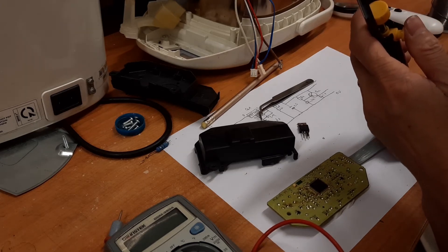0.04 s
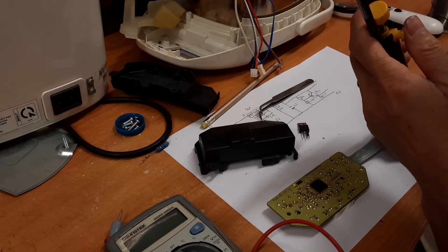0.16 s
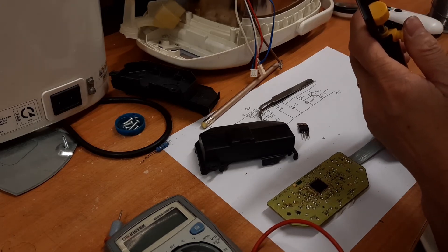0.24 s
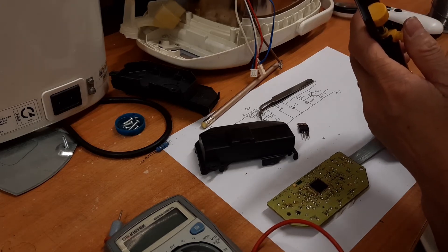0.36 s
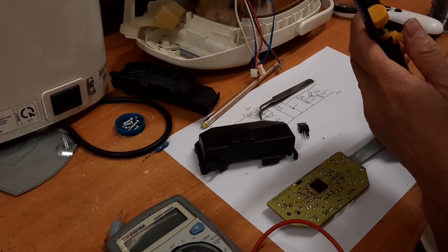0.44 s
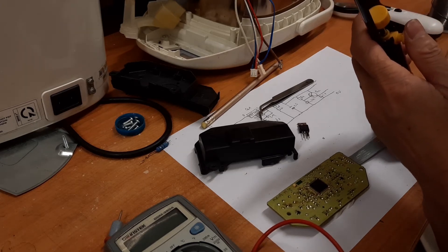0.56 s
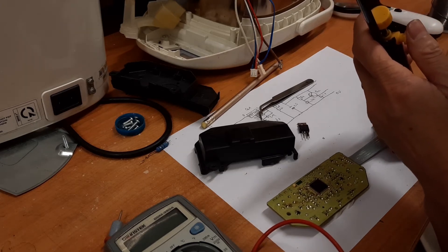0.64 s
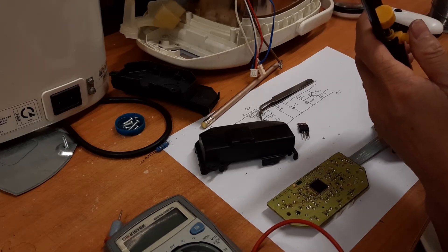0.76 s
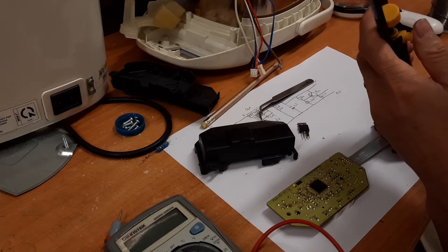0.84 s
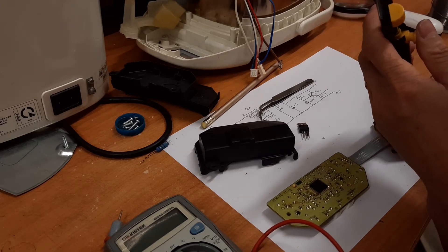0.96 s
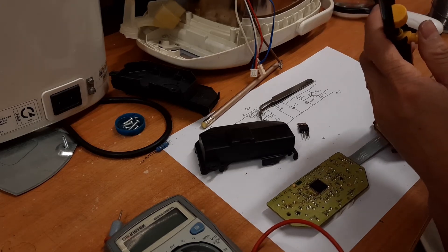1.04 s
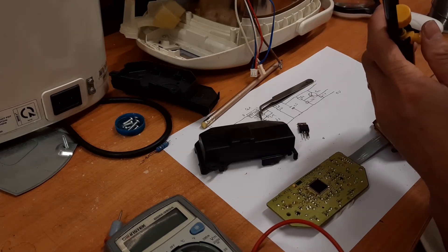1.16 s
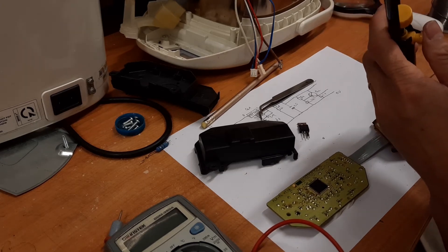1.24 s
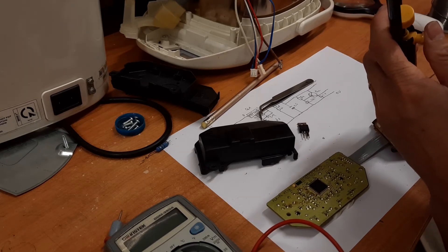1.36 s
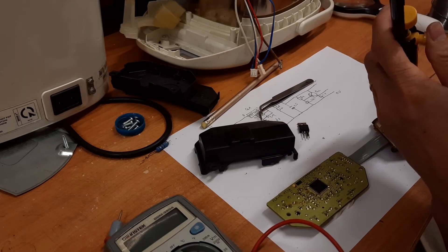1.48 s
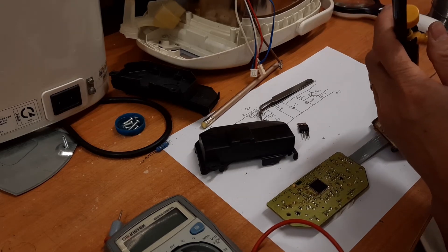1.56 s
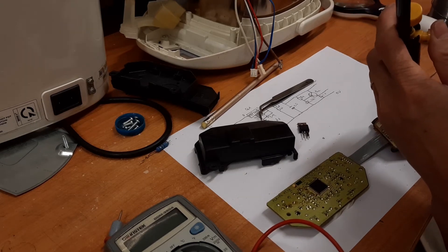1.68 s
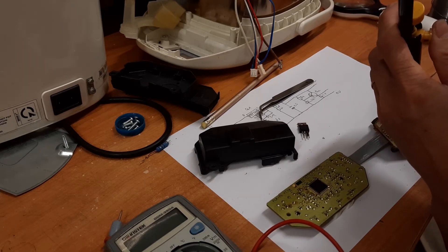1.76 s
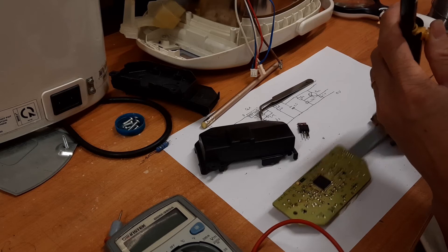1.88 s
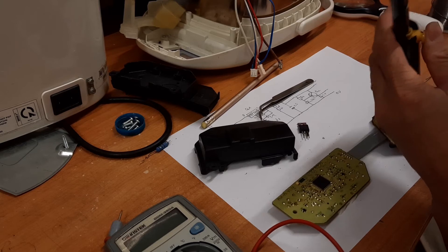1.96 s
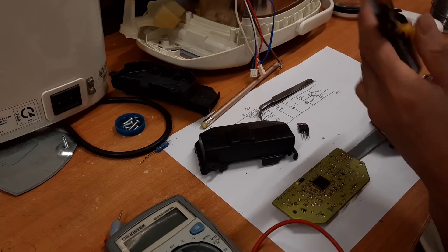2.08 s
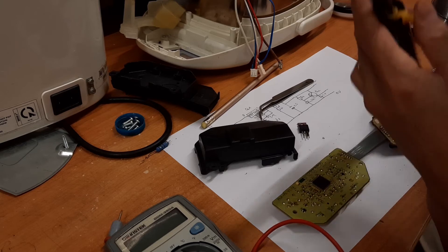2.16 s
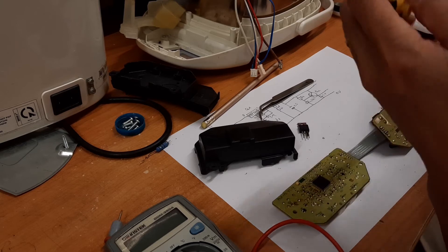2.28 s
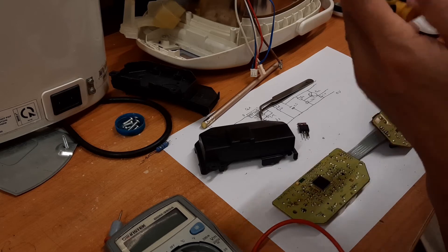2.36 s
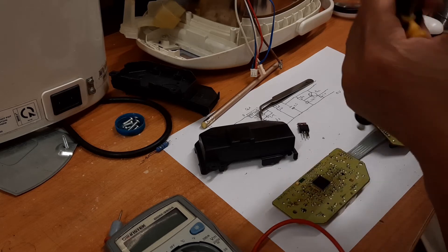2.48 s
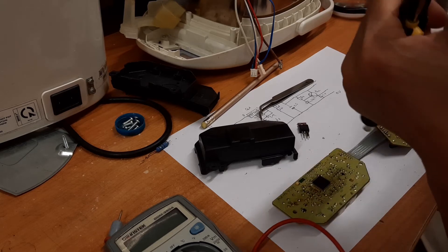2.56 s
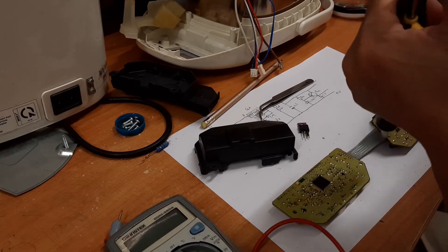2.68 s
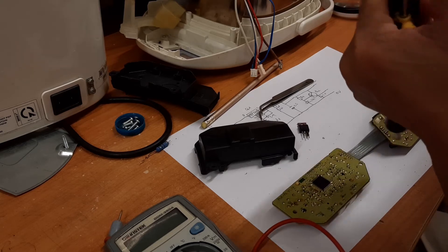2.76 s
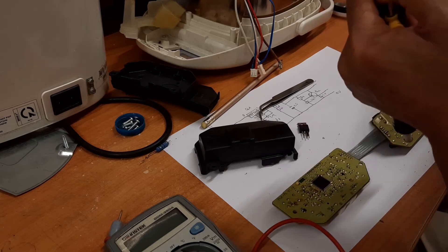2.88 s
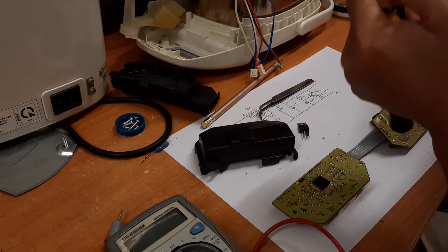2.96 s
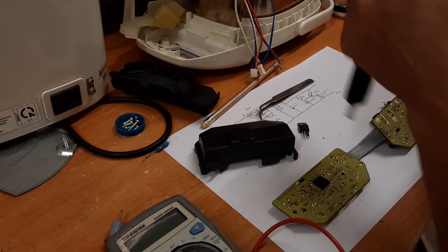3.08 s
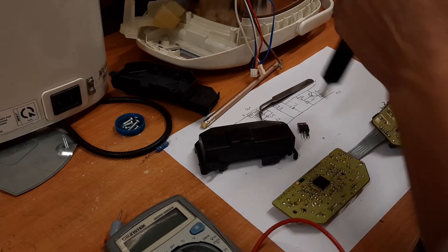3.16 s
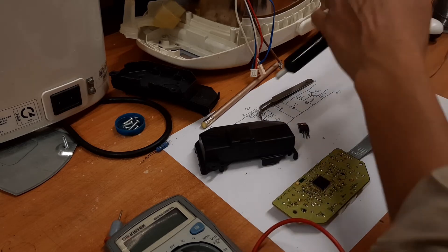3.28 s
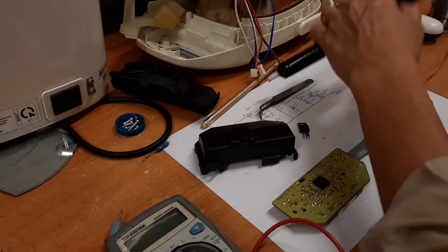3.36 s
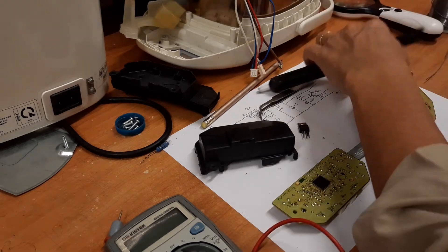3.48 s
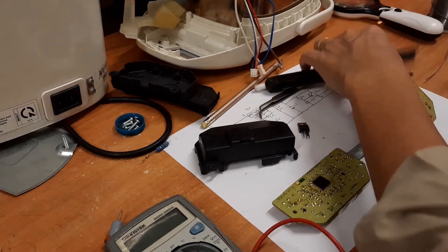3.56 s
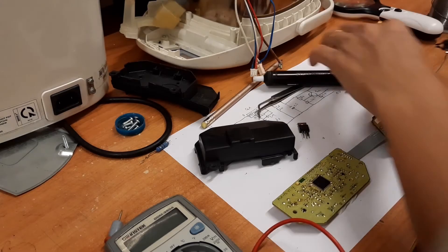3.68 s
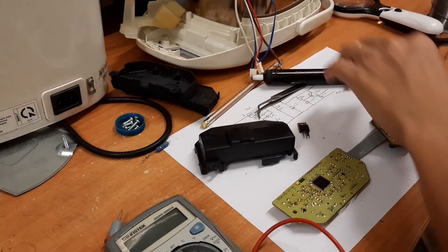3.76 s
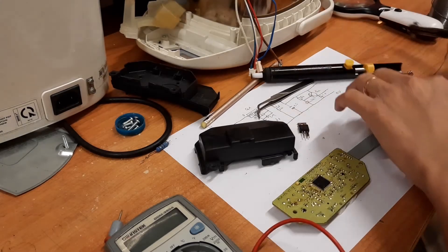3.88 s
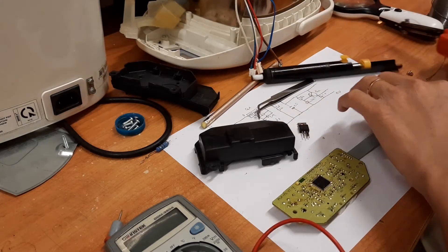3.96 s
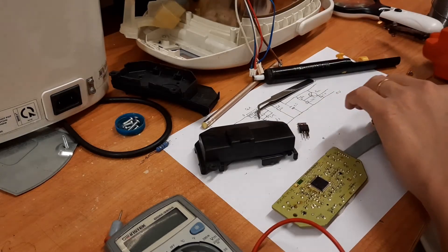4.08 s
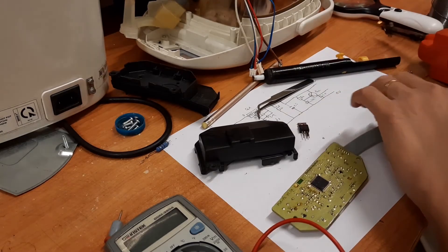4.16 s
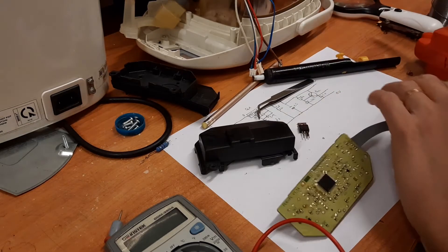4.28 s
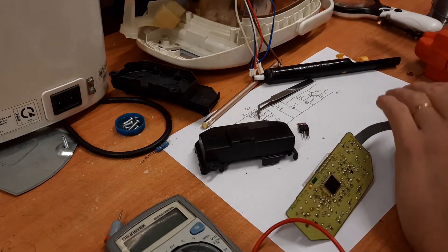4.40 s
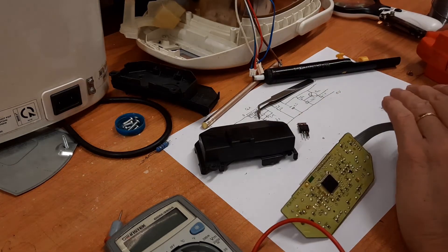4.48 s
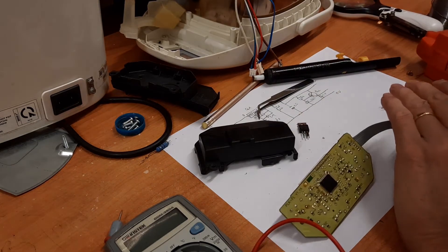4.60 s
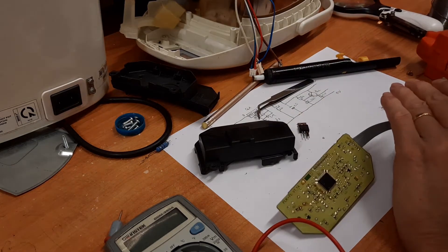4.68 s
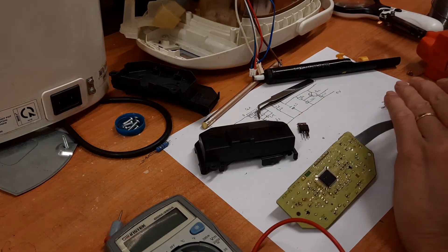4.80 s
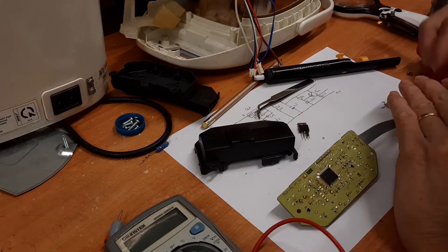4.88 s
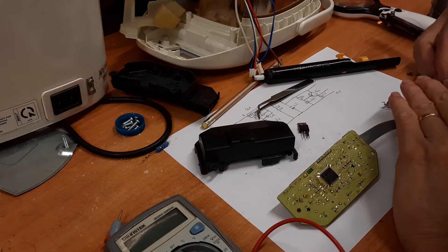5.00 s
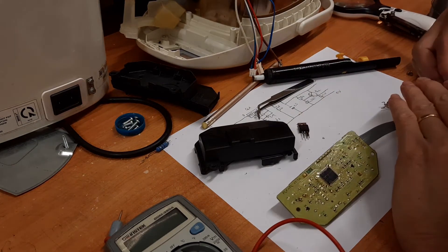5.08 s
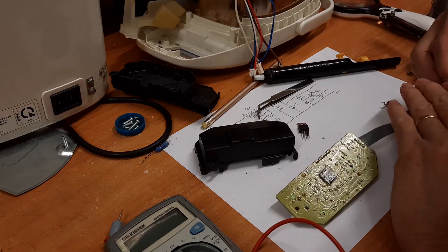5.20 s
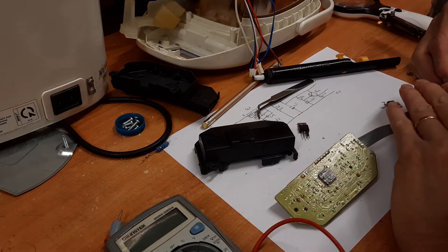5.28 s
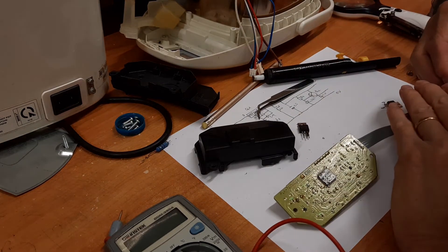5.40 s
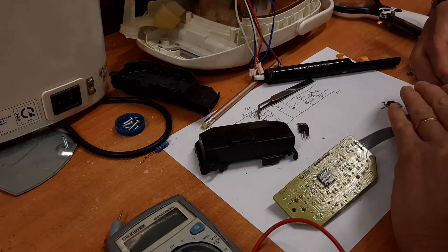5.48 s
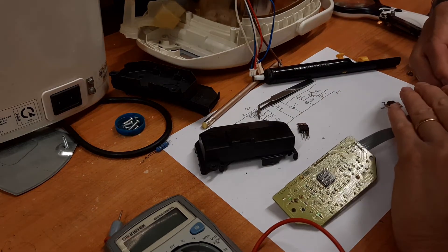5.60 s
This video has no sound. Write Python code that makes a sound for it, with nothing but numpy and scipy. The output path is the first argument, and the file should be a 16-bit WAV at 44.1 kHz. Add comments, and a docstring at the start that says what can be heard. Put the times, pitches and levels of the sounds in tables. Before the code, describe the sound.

A hand tool clicks over, snaps sharply twice at a workbench, clatters down onto wood, then heavier objects thump over a low steady hum.

```python
"""Hand tool at a workbench

A hand tool is cocked, snaps against a circuit board and is laid down with a clatter; then two heavier
things are set on the wooden top. Each blow is a noise rattle filtered by resonances, plus a modal bench thud.
Fingers rub and loose parts jitter as grainy noise, and the bench rumbles under small random pushes.
A small room answers with decaying sparse echoes, over low ventilation noise and microphone hiss.
A gain control ducks everything after each loud blow, so the hum dips."""
import sys
import numpy as np
from scipy import signal
from scipy.fft import rfft, irfft, next_fast_len
from scipy.io import wavfile
from scipy.ndimage import uniform_filter1d

SR = 44100
rng = np.random.default_rng(int(sys.argv[2]) if len(sys.argv) > 2 else 0)


def store_wav(level_fs):
    """Save 16-bit WAV to argv[1]."""
    pcm = np.round(np.clip(np.atleast_2d(level_fs), -1, 1) * 32767)
    wavfile.write(sys.argv[1], SR, pcm.T.astype(np.int16))


N = 248724  # length in samples
SPREAD_DB = 1.5  # standard deviation of each mode's weight from blow to blow


def gain_of(db):
    """Logarithmic level: decibels to amplitude gain."""
    return 10 ** (np.asarray(db) / 20)


def evened(x):
    """Power normalisation: scales to rms 1."""
    return x / np.sqrt(np.mean(x ** 2) + 1e-20)


def read(points, hz):
    """Logarithmic pitch: interpolates a table on a log-frequency axis."""
    f, value = np.transpose(points)
    return np.interp(np.log(hz + 1), np.log(f + 1), value)


def add(mix, s, sound):
    """Superposition: mixes a sound in at time s."""
    part = mix[:, round(s * SR):][:, :sound.shape[1]]
    part += sound[:, :part.shape[1]]


def noise(colour, likeness, patchy_db):
    """Partial coherence: two-channel coloured noise of rms 1 whose spectrum drifts in patches."""
    frames, hz = N // 256 + 5, np.fft.rfftfreq(1024, 1 / SR)
    a, b, c, d, patches = rng.standard_normal((frames, 513, 5)).T
    patches = uniform_filter1d(patches, 6, 0)  # smooth over pitch
    patches = evened(uniform_filter1d(patches, 12, 1))  # smooth over time
    same = np.clip(likeness(hz), -1, 1)[:, None]
    left = a + 1j * b
    right = same * left + np.sqrt(1 - same ** 2) * (c + 1j * d)
    spectrum = np.array([left, right]) * gain_of(read(colour, hz)[:, None] + patchy_db * patches)
    return evened(signal.istft(spectrum, nperseg=1024, noverlap=768)[1][:, :N])


# Airflow spectrum. Each row: frequency in Hz, relative density in dB per Hz.
AIRFLOW = [(12, -63), (20, -30.5), (49, -9.5), (76, -31.5), (93, -20), (114, -1.5), (174, -8), (217, -5.5),
           (250, -13.5), (325, -2), (398, -28.5), (517, -17), (840, -35), (987, -42), (2500, -60.5),
           (3250, -91.5), (5500, -120)]
# Left-right coherence of the airflow. Each row: frequency in Hz, correlation from -1 to 1.
AIRFLOW_LIKENESS = [(60, 0.96), (180, 0.94), (550, 0.47), (1650, -0.52), (4970, -0.4), (15000, -0.1)]
# Duct resonances. Each row: frequency in Hz, width of one filter pass in Hz, rms level in dB before panning.
DUCT_MODES = [(122.8, 27, -46.5), (329.7, 12, -51)]


def hum():
    """Resonance driven by turbulence: low ventilation noise with two ducts singing in it."""
    out = gain_of(-43) * noise(AIRFLOW, lambda hz: read(AIRFLOW_LIKENESS, hz), patchy_db=2.0)
    for hz, width, db in DUCT_MODES:
        radius = np.exp(-np.pi * width / SR)
        poles = [1, -2 * radius * np.cos(2 * np.pi * hz / SR), radius ** 2]
        once = signal.lfilter([1], poles, rng.standard_normal(N))
        twice = signal.lfilter([1], poles, once)
        out = out + gain_of(db) * evened(twice)
    return out * gain_of([[.6], [-.6]])


# Hiss spectrum. Each row: frequency in Hz, relative density in dB per Hz.
HISS_COLOUR = [(1180, -31), (2000, -1), (2500, -7), (4140, -10), (6540, -12), (8620, -16), (11800, -7),
               (14100, -4), (15800, -5)]


def hiss():
    """Self-noise: the microphone's own weakly coherent hiss."""
    return gain_of(-77) * noise(HISS_COLOUR, lambda hz: .3 + 0 * hz, patchy_db=-0.3)


def rattle(contact_ms, size):
    """Spectral flattening: a burst of chatter, about equally strong at all pitches."""
    u = np.arange(size) / SR * 1000 / max(contact_ms, .3)
    shape = (1 - np.exp(-u * 6.7)) * np.exp(-u * 0.87)
    spectrum = rfft(rng.standard_normal(size) * shape)
    flattened = spectrum / (abs(spectrum) + 1e-9) ** .8
    return irfft(flattened) * shape ** .3


def causal(gain):
    """Minimum phase: a body rings only after it is struck, so the cepstrum is folded forward in time."""
    cepstrum = irfft(np.log(gain + 1e-5))
    half = len(cepstrum) // 2
    cepstrum[1:half] *= 2
    cepstrum[half + 1:] = 0
    return np.exp(rfft(cepstrum))


# Modes of the wooden top. Each row: frequency in Hz, mean relative level in dB, 60 dB decay time in seconds.
BENCH_MODES = [(82, -2, 0.1), (126.7, 3.5, 0.062), (172.2, -3, 0.1), (199.5, -3, 0.066), (230, 2.5, .11),
               (264.4, -1, 0.19), (303.2, 1, 0.086), (353.4, -2.5, 0.032), (434, 2.5, 0.058),
               (534, 2.5, 0.023), (602, 6, 0.04), (763, -8.5, 0.02), (907, -3.5, 0.079),
               (1337, -10.5, 0.019)]


def bench_top(t):
    """Modal superposition: damped modes of the wooden top, neighbours in opposite sense."""
    hz, db, t60 = np.transpose(BENCH_MODES)[:, :, None]
    db = db + SPREAD_DB * rng.standard_normal(hz.shape)
    sense = (-1) ** np.arange(len(hz))[:, None]
    return (sense * gain_of(db - 60 * t / t60) * np.sin(2 * np.pi * hz * t)).sum(0)


# Band centres, from knock to fizz. Each row: frequency in Hz.
BANDS = [950, 3200, 6700, 12500]


# Blow tables below. Each row: start in seconds, click peak in dB before panning, brightness in dB per octave,
# contact time scale in ms, bench thud peak in dB relative to the click.
# Body tables below. Each row: mode frequency in Hz, half-power width in Hz, mean relative level in dB.
# Hit tables below hold: drive in dB in each of BANDS, left-right difference in dB, lag of the left in ms.
def blows(events, body, hit, crack_db, alike):
    """Source and filter: each contact is a short rattle that rings the thing struck and knocks the bench."""
    lead_s = .001  # room before a click for the port delays
    out, t, bins = np.zeros((2, N)), np.arange(SR // 4) / SR, np.fft.rfftfreq(4096, 1 / SR)
    hz, width, mode_db = np.transpose(body)[:, :, None]
    bands_db, pan_db, lag_ms = hit
    drive_db = read(list(zip(BANDS, bands_db)), bins)
    octaves = np.log2(np.clip(bins, BANDS[0], BANDS[-1]) / 3800)  # brightness turns about 3800 Hz
    low_cut = (bins / (bins + 400)) ** 2 / np.sqrt(bins + 400)
    halves = np.array([[.5], [-.5]])
    ports = np.exp(-2j * np.pi * bins * (lead_s + halves * lag_ms / 1000))
    sides_db = halves * pan_db
    for s, db, bright_db, contact_ms, thud_db in events:
        weight = gain_of(mode_db + SPREAD_DB * rng.standard_normal(hz.shape))
        peaks = (weight ** 2 / (1 + (2 * (bins - hz) / width) ** 2)).sum(0)
        struck = np.sqrt(peaks + gain_of(crack_db) ** 2)  # the bare crack fills between the modes
        colour = gain_of(drive_db + bright_db * octaves) * low_cut
        left, other = rattle(contact_ms, size=2048), rattle(contact_ms, size=2048)
        right = alike * left + np.sqrt(1 - min(alike, 1) ** 2) * other
        click = irfft(rfft([left, right], 4096) * causal(struck * colour) * ports)
        # the push on the bench is a smooth pulse, briefer for a shorter contact
        push = np.clip(t[:800] * 1000 / (0.3294 * max(contact_ms, .3)), 0, 1)
        knock = np.sin(np.pi * push) ** 2 / max(contact_ms, .3)
        knock = knock + 0.059 * left[:800] / abs(left).max()
        thud = signal.fftconvolve(bench_top(t), knock)
        add(out, s - lead_s, gain_of(db + sides_db) * click / abs(click).max())
        add(out, s, gain_of(db + thud_db + np.array([[.7], [-.7]])) * thud / abs(thud).max())
    return out


# Blows of the tool in the hand, its modes and its hit.
TOOL_BLOWS = [(.985, -65, 7, 1.9, -30), (1.025, -70, 3, 3.3, -30), (1.09, -70, 1, 3, -26),
              (1.155, -71, 1.5, 3, -23), (1.835, -17, -3.1, 13, -33), (1.849, -8, 5, 1.75, -23),
              (1.928, -24.5, -4.3, 1.9, -17.5), (2.087, -50.5, 8, 5, -23.5), (2.257, -42, 7, 1.75, -22),
              (2.284, -44, 3, 4.7, -24), (2.321, -46, 1.2, 4, -23), (2.458, -54.5, 1.5, 1.9, -22.5),
              (2.53, -45.5, -9.5, 7.3, -26), (2.614, -54.5, -4, 3.5, -8.5),
              (2.624, -52.5, -4.5, 6.8, -17.5), (2.697, -38.5, -0.2, 1.9, -25.5),
              (2.796, -47, -3.8, 3.4, -19), (2.855, -42.5, -4.5, 2.6, -25.5), (5.172, -55, 1, 4.6, -23),
              (5.621, -32, 1.5, 2.45, -14)]
TOOL_MODES = [(830, 270, 0.5), (1263, 44, 5), (2160, 120, 6), (2840, 290, -1.5), (3970, 730, -11.5),
              (5910, 2700, 2.5), (7360, 1100, 2), (12300, 1500, -5), (14700, 400, 2)]
TOOL_HIT = ((-6, -1.9, -3.5, -4), 1.1, .12)


def clicks():
    """Impact excitation: the hand tool clicks and knocks as it is handled."""
    return blows(TOOL_BLOWS, TOOL_MODES, TOOL_HIT, crack_db=-11, alike=0.45)


# Blows of the latch, modes of the cocked tool and its hit.
LATCH_BLOWS = [(1.658, -40.5, -1.2, 4.9, -31.5), (1.726, -41, 0, 2.2, -34), (1.734, -46.5, 9, 3.5, -27.5),
               (1.76, -45.5, -.5, 4, -32.5), (1.769, -12, -1.8, 3.7, -27.5)]
COCKED_MODES = [(970, 90, 23.5), (1270, 77, 14), (2050, 300, -36), (2760, 290, 7), (3790, 350, -1.5),
                (5440, 270, 2), (7400, 430, 6), (12830, 1600, -0.5)]
COCKED_HIT = ((-17.5, -0.5, -9, -13.5), 1.1, 0.17)


def latch():
    """Impact excitation: the plunger is cocked and its latch clicks over."""
    return blows(LATCH_BLOWS, COCKED_MODES, COCKED_HIT, crack_db=-12, alike=0.46)


# Stroke tables below. Each row: start in seconds, hold in seconds, rms level in dB before the droop.
# Stroke shapes below hold: rise in seconds, droop while held in dB per second, release in dB per second.
def level_of(strokes, shape):
    """Envelope: each stroke rises, droops while held, then dies away exponentially."""
    (rise_s, droop_db, release_db), level = shape, np.zeros(N)
    for start, hold, db in strokes:
        t = np.arange(N) / SR - start
        fall_db = droop_db * np.clip(t, 0, hold) + release_db * np.maximum(t - hold, 0)
        level += np.clip(t / max(rise_s, .001), 0, 1) * gain_of(db - fall_db)
    return level


# Hands and tool shifting on the bench top: strokes and their shape.
SHUFFLE_STROKES = [(1.835, 0.029, -26), (1.935, 0.023, -28.5), (3.467, 0.018, -28.5), (3.525, .03, -50.5),
                   (3.61, 0.35, -40), (3.962, 0.0072, -36)]
SHUFFLE_ENVELOPE = (0.01103, 20, 940)


def shuffle():
    """Random forcing of modes: small uneven pushes keep the bench top rumbling."""
    unevenness = evened(uniform_filter1d(rng.standard_normal(N), 300))
    pushes = rng.standard_normal(N) * gain_of(4 * unevenness)
    top = np.convolve(bench_top(np.arange(SR // 4) / SR), np.hanning(60))  # soft skin dulls the push
    rumble = evened(signal.oaconvolve(pushes, top)[:N])
    return rumble * level_of(SHUFFLE_STROKES, SHUFFLE_ENVELOPE) * gain_of([[.7], [-.7]])


def friction(level, colour, grain_db, grain):
    """Stick-slip: grainy noise under each stroke; grain is the length of one slip in samples."""
    slips = gain_of(grain_db * evened(uniform_filter1d(rng.standard_normal(N), grain)))
    return noise(colour, lambda hz: 0.27 + 0 * hz, patchy_db=2.0) * level * evened(slips)


# Loose parts after a blow: strokes and their shape.
JITTER_STROKES = [(1.85, 0.1, -40.5), (3.635, 0.093, -47), (3.88, .025, -59.5), (4.19, 0.13, -64),
                  (4.31, 0.09, -63)]
JITTER_ENVELOPE = (0.027, 28, 580)
# Spectrum of the loose parts. Each row: frequency in Hz, relative density in dB per Hz.
LOOSE_COLOUR = [(410, -34.5), (700, -2), (1110, -4), (1630, -6), (2040, 0), (3020, -6.5), (6660, -10.5),
                (10200, -14.5), (13900, -12), (15700, -12), (16300, -26)]


def jitter():
    """Granular noise: loose parts jitter after a blow, with strong short grains."""
    return friction(level_of(JITTER_STROKES, JITTER_ENVELOPE), LOOSE_COLOUR, grain_db=5, grain=90)


# Fingers rubbing: strokes and their shape.
RUB_STROKES = [(2.252, .09, -66), (2.52, 0.0086, -67), (2.606, 0.069, -64), (2.692, .05, -62),
               (2.76, .11, -64.5), (5.07, 0.027, -73.5), (5.17, 0.0055, -66)]
RUB_ENVELOPE = (0.0053, 41, 310)
# Spectrum of the rubbing. Each row: frequency in Hz, relative density in dB per Hz.
RUB_COLOUR = [(410, -33), (700, -6), (948, -5.5), (1390, -9.5), (1690, -3), (2120, 3.5), (2900, -13),
              (3680, -8), (4610, -23), (7500, -7.5), (9260, -19.5), (11900, -16), (15300, -14),
              (16300, -17.5)]


def rubs():
    """Sliding friction: fingers rub, with longer and gentler grains."""
    return friction(level_of(RUB_STROKES, RUB_ENVELOPE), RUB_COLOUR, grain_db=3.5, grain=150)


# Blows of the plunger snapping loose, modes of the barrel and its hit.
SNAP_BLOWS = [(2.89, -6.5, 2, 3, -30.5), (3.006, -33, -2.5, 4.5, -31.5), (3.119, -40, -3.8, 3.5, -33)]
BARREL_MODES = [(1200, 310, 3.5), (2830, 400, 5), (4300, 670, 7), (5440, 400, -8.5), (6980, 460, 3),
                (8510, 500, 2), (10210, 700, 1.5), (13100, 790, -4), (13600, 810, -2)]
BARREL_HIT = ((-4, 0, -6, 3), 2.1, 0.046)


def snap():
    """Impact excitation: the plunger snaps loose and the barrel rings."""
    return blows(SNAP_BLOWS, BARREL_MODES, BARREL_HIT, crack_db=-30.5, alike=0.2)


# Blows of the rebounding plunger, modes of its stop and its hit.
REBOUND_BLOWS = [(3.018, -23.5, 4.5, 15, -21), (3.0265, -9.5, -1.5, 0.9, -19.5)]
STOP_MODES = [(704, 480, 11.5), (1320, 170, -46.5), (2880, 940, 2), (6660, 2200, 1.5), (13640, 2400, 1.5)]
STOP_HIT = ((-4.5, 1, -1.9, -6.5), 0.37, .057)


def rebound():
    """Impact excitation: the plunger rebounds against its stop."""
    return blows(REBOUND_BLOWS, STOP_MODES, STOP_HIT, crack_db=-18.5, alike=0.266)


# Blows of the tool laid on the bench, its modes there and its hit.
CLATTER_BLOWS = [(3.47, -42.5, -1.8, 4.8, -24), (3.519, -47.5, -3.5, 3, -19), (3.566, -33, 4.2, 2.4, -12),
                 (3.583, -22, 1.5, 12, -20), (3.602, -4.5, -4, 1.6, -17), (3.687, -15, -0.2, 4.6, -20),
                 (3.724, -23, -1.5, 4.8, -14.5), (3.792, -36, -11, 6.8, -12),
                 (3.966, -26.5, -2.5, 2.9, -36)]
LAID_MODES = [(586, 120, 11.5), (1466, 180, 9.5), (2700, 200, -35), (3660, 170, -2), (4754, 180, 9),
              (5850, 1250, 11.5), (7170, 890, 7), (12180, 400, -12), (14700, 1000, -7)]
LAID_HIT = ((-2.4, 0, -8, 4.25), 2.7, 0.157)


def clatter():
    """Repeated impact: the tool is laid on the bench with a clatter."""
    return blows(CLATTER_BLOWS, LAID_MODES, LAID_HIT, crack_db=-5, alike=.4)


# Blows of heavy things set down, their modes and their hit.
THUMP_BLOWS = [(4.1615, -13.5, -8, 5.5, 8), (4.184, -36, 0, 3.8, 20), (4.222, -27, -8.5, 3.7, 6.5),
               (4.358, -23, -7.5, 1.6, -8), (4.37, -40, -6.5, 5.3, 13.5), (4.421, -14, -10, 6.4, 3),
               (4.4385, -13.5, -8.5, 1.9, 8.5), (4.461, -43.5, -9.6, 8.2, 14)]
HEAVY_MODES = [(920, 360, -1), (1567, 300, 0.5), (2090, 1220, 0), (2620, 800, 7), (5000, 2590, -10),
               (12600, 4900, 2.5)]
HEAVY_HIT = ((3.5, -2, 1.5, -1), 1.43, 0.15)


def thumps():
    """Impact on a plate: heavy things set down, most with a bench thud louder than their click."""
    return blows(THUMP_BLOWS, HEAVY_MODES, HEAVY_HIT, crack_db=-3.5, alike=0.19)


# Left-right coherence of the room. Each row: frequency in Hz, correlation.
ECHO_LIKENESS = [(150, 1), (500, 0.83), (1200, 0.067), (4000, 0.24), (12000, 0.11)]
# What the walls send back. Each row: frequency in Hz, relative level in dB.
WALL_COLOUR = [(300, 0.86), (1500, 0.15), (4000, 1.57), (9000, -2), (15000, -1.5)]
# Reverberation. Each row: frequency in Hz, 60 dB decay time in seconds.
ROOM_DECAY = [(150, .45), (500, 0.47), (1500, 0.43), (4000, 0.37), (9000, 0.41), (15000, 0.37)]


def room(x):
    """Diffuse reverberation: sparse taps of random sign, each band dying at its own speed, the bass coherent."""
    taps = np.zeros((2, SR))
    at = np.arange(200, SR - 20, 20) + rng.integers(0, 20, (2, (SR - 201) // 20))
    np.put_along_axis(taps, at, rng.choice([-1., 1.], at.shape), 1)
    hz, t, (a, b) = signal.stft(taps, SR, nperseg=256)
    same = np.clip(read(ECHO_LIKENESS, hz), -1, 1)[:, None]
    pair = np.array([a, same * a + np.sqrt(1 - same ** 2) * b])
    pair = pair * gain_of(read(WALL_COLOUR, hz))[:, None]
    decay = gain_of(-60 * (t / read(ROOM_DECAY, hz)[:, None]) ** 0.93)  # slightly faster at first
    tail = signal.istft(pair * decay, SR, nperseg=256)[1]
    # the left channel alone feeds both sides of the room
    return signal.fftconvolve(x[:1], tail / np.linalg.norm(tail[0]), axes=1)[:, :N]


def scene():
    """Superposition: all sources, with the room answering all but the hum."""
    hand = latch() + clicks() + snap() + rebound() + rubs() + jitter()
    laid = clatter() + shuffle()
    heavy = thumps()
    echo = room(gain_of(-9.5) * hand + gain_of(-5.5) * laid + gain_of(-6.0) * heavy)
    return hand + laid + heavy + echo + hum()


def excess(power_db, limit_db, recover_db):
    """Peak hold: level over a limit, let go at so many dB a second."""
    fall = np.arange(N) * recover_db / SR
    return np.maximum(np.maximum.accumulate(power_db + fall) - fall - limit_db, 0)


# Microphone response. Each row: frequency in Hz, gain in dB.
MIC_RESPONSE = [(25, -3), (70, -1.5), (150, -1.08), (5000, 7), (7500, 11), (10000, 6), (14000, 6.5)]


def record(dry):
    """Dynamic compression: microphone colour and hiss, quick and slow gain control, then a band limit."""
    size = next_fast_len(N + 8192)
    response = gain_of(read(MIC_RESPONSE, np.fft.rfftfreq(size, 1 / SR)))
    heard = irfft(rfft(dry, size) * response, size)[:, :N] + hiss()
    power = abs(uniform_filter1d((heard ** 2).mean(0), 200))
    power_db = 10 * np.log10(power + 1e-12)
    quick_db = 0.05 * excess(power_db, limit_db=-1.5, recover_db=121.0)
    slow_db = 0.096 * excess(power_db, limit_db=-45.5, recover_db=16)
    cut_db = uniform_filter1d(quick_db + slow_db, 150, origin=60)  # lags by 60 samples
    ducked = heard / gain_of(cut_db)
    low_pass = signal.firwin(601, 15850, window=("kaiser", 9), fs=SR)  # edge in Hz
    return signal.oaconvolve(ducked, low_pass[None], "same")


dry = scene()
out = record(dry)
store_wav(out)
```